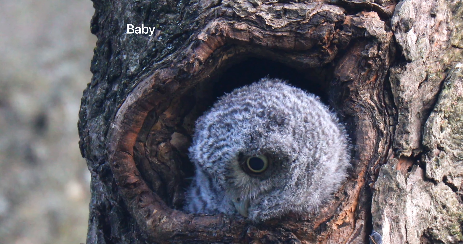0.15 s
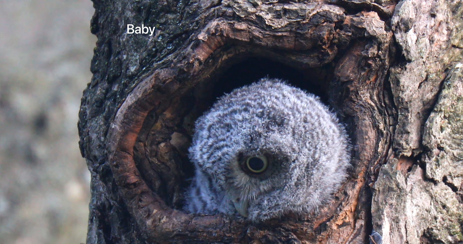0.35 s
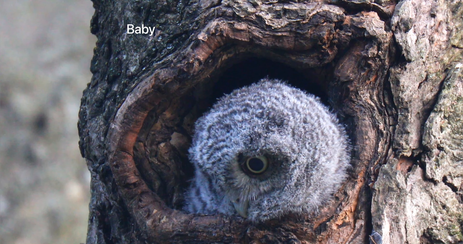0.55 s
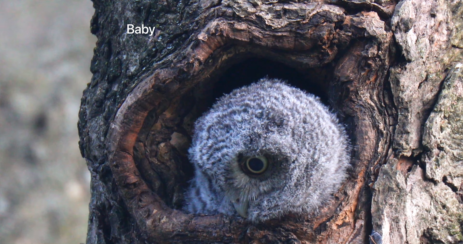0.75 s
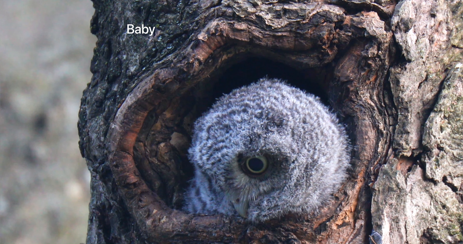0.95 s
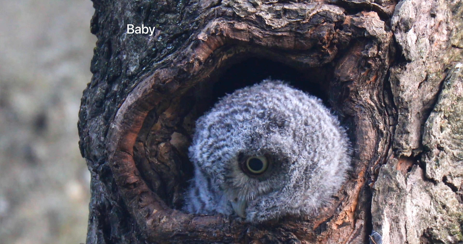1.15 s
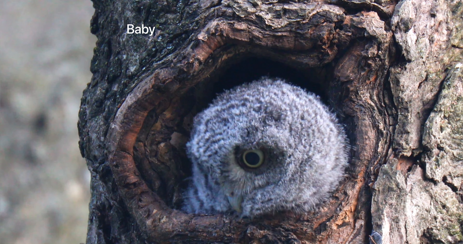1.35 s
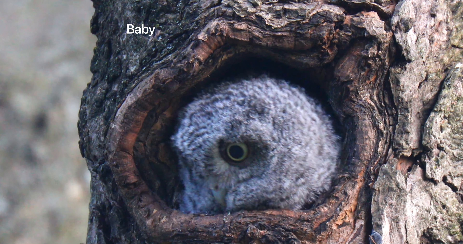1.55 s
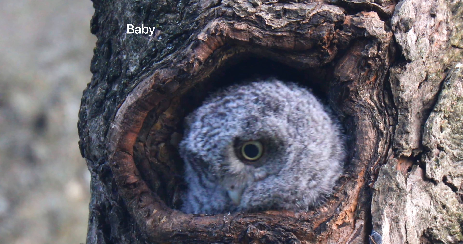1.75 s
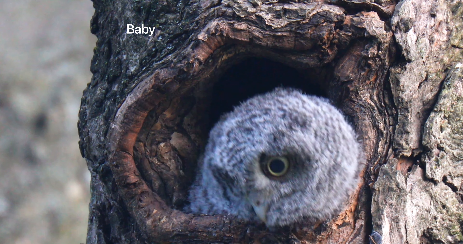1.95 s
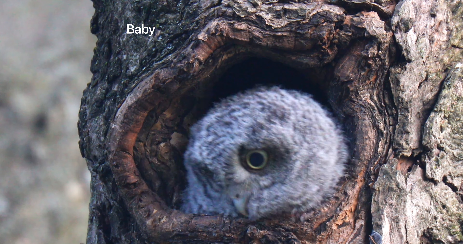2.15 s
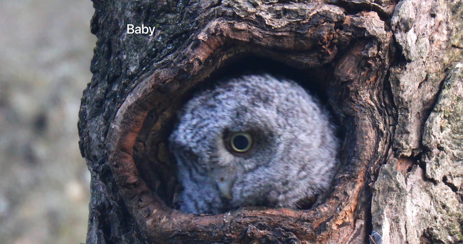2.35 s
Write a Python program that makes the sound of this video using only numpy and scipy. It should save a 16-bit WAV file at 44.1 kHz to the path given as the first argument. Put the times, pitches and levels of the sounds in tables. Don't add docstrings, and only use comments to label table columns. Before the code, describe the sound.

Close, mono outdoor sound of a small owl's quick, even trill: soft first notes, steady mellow hoots, a short slower stretch, then faster pulses to a weak last note, over quiet low hum, faint insects and feather brushing.

```python
import sys
import numpy as np
from scipy import signal
from scipy.fft import rfft, irfft
from scipy.io import wavfile
from scipy.ndimage import uniform_filter1d

SR = 44100
rng = np.random.default_rng(int(sys.argv[2]) if len(sys.argv) > 2 else 0)


def amplitude_ratio(level_db):
    exponent = np.asarray(level_db, float) / 20
    return 10 ** exponent


def wrap_up_sound(samples):
    columns = np.atleast_2d(samples).T
    tamed = np.clip(columns, -1, 1)
    steps = np.round(tamed * 32767).astype(np.int16)
    wavfile.write(sys.argv[1], SR, steps)


N = 105840

# frequency in Hz, density in dB per Hz.
NIGHT_SPECTRUM = [(15, -32), (25, 1.5), (173, -7.5), (281, -8.5), (313, -1.5), (399, -10), (482, -11.5),
                  (4380, -29.5), (15500, -46)]
# centre in Hz, width in Hz, level in dB, throb rate per s, throb depth in dB.
HUMS = [
    (51.3, 25, -53.5, 8, 0),
    (128, 42, -50.5, 8, -0.5),
    (345.3, 85, -56.5, 3.8, 1),
    (4110, 450, -70, 14, 3.5),
    (4405, 360, -69.5, 14, 1),
    (5030, 79, -75, 7, 2.5),
    (5296, 220, -70.5, 21, 1),
]
# start in s, length in s, effort in dB, top pitch in Hz.
HOOTS = [(0.149, 0.03, -38.5, 622), (0.2219, 0.0308, -30.6, 630.0), (0.2865, 0.041, -29.5, 651.0),
         (0.3595, 0.0425, -28.6, 663.0), (0.4322, 0.0419, -28.3, 668.0), (0.5031, 0.0435, -28.5, 673.0),
         (0.5763, 0.0432, -28.2, 679.0), (0.6514, 0.0417, -28.4, 682.0), (0.7241, 0.0397, -28.1, 687.0),
         (0.7971, 0.0393, -28.2, 688.0), (0.8696, 0.0375, -28.2, 690.0), (0.9391, 0.0369, -28.1, 692.0),
         (1.0088, 0.0352, -28.1, 694.0), (1.0761, 0.034, -28.4, 692.0), (1.1425, 0.0342, -28.5, 691.0),
         (1.2104, 0.0499, -28.4, 682.0), (1.3009, 0.0551, -28.3, 673.0), (1.3987, 0.0531, -28.2, 674.0),
         (1.4936, 0.0501, -28.0, 679.0), (1.5853, 0.0341, -27.6, 693.0), (1.6603, 0.0312, -27.3, 709.0),
         (1.7188, 0.0312, -27.8, 700.0), (1.7802, 0.0293, -27.8, 697.0), (1.8413, 0.0286, -27.8, 693.0),
         (1.903, 0.0286, -28.1, 690.0), (1.9643, 0.0285, -28.0, 686.0), (2.0271, 0.0277, -28.3, 683.0),
         (2.0903, 0.0276, -28.1, 677.0), (2.158, 0.025, -35, 624)]
# time in s, pitch rise in Hz, sag in Hz, attack in s,
# creep before the attack in dB.
MANNER = [(.15, -6, 20, .008, -14), (.22, -24, 0, .0022, -18), (.3, 17, 10, .003, -21),
          (.44, 23, 9, .0023, -16), (.52, 38, 9, .007, -13), (.75, 56, 6, .01, -5),
          (1.15, 70, 25, .0107, -3), (1.3, 24, 22, .0075, -22), (1.52, 29, 23, .008, -20),
          (1.66, 59, 46, .007, -13), (2.1, 31, 24, .007, -14), (2.16, 0, 20, .011, -10)]
# pitch in Hz, fundamental in dB, octave in dB, octave phase in rad,
# upper partials in dB.
THROAT = [(560, -3.8, .8, -2.8, -16), (590, 1.1, 2.6, -3.1, -12), (620, 6.2, 3.2, -2.7, -9),
          (645, 9.4, 2.0, -2.1, -5.5), (665, 12.0, -.6, -1.75, 0), (685, 14.1, -4.2, -1.3, 1)]
# frequency in Hz, level in dB.
UPPER_PARTIALS = [(1700, -7.5), (2000, -18.5), (2650, -24), (3300, -32.5), (4500, -44.5), (6000, -42.5),
                  (7300, -40), (13000, -74.5)]
# time in s, frequency in Hz, level in dB.
THROAT_RING = [(.22, 8900, -7.5), (.3, 8440, 3.5), (.4, 7830, -0.5), (.75, 7790, -0.5), (1.15, 7720, -6),
               (1.52, 7600, -4), (1.66, 7750, -5), (2.1, 7820, -5.5)]
# centre in s, length in s, level in dB, frequency in Hz, width in Hz.
RUSTLES = [
    (1.0, .26, -56, 1750, 500),
    (1.41, .05, -51, 2100, 1000),
    (1.46, .09, -55, 1600, 500),
    (1.43, .09, -53, 950, 350),
    (1.58, .09, -53, 1750, 800),
    (1.64, .14, -55, 1300, 900),
    (2.058, .055, -51, 1850, 700),
    (2.055, .05, -57, 2700, 400),
    (2.11, .12, -56, 1600, 500),
]

FULL_VOICE_DB = -29.5


def band(hz, width_hz):
    f = np.arange(N // 2 + 1) * SR / N
    spectrum = rfft(rng.standard_normal(N)) / (1 + (2 * (f - hz) / width_hz) ** 2)
    x = irfft(spectrum, N)
    return x / x.std()


def walk(rate_hz):
    hold = int(SR / rate_hz)
    steps = np.repeat(rng.standard_normal(N // hold + 4), hold)
    w = uniform_filter1d(uniform_filter1d(steps, hold), hold)[hold:N + hold]
    return w / w.std()


def logistic(x):
    return 1 / (1 + np.exp(-x))


def decay(t, tau_s):
    return np.exp(-np.maximum(t, -tau_s) / tau_s)


def night():
    air = np.zeros(N)
    spectrum_hz, spectrum_db = np.array(NIGHT_SPECTRUM).T
    for hz in 25 * 2 ** np.arange(0, 9.4, .5):
        density_db = np.interp(np.log(hz), np.log(spectrum_hz), spectrum_db)
        db = density_db + 10 * np.log10(hz) + 0.2 * walk(15)
        air += amplitude_ratio(db) * band(hz, 0.53 * hz)
    out = amplitude_ratio(-47) * air / air.std()
    for hz, width_hz, db, throb_hz, throb_db in HUMS:
        out += amplitude_ratio(db + throb_db * walk(throb_hz)) * band(hz, width_hz)
    return out


def pitch(u, length, db, top_hz, rise_hz, sag_hz):
    rise_s, sag_s, fall_s, fall_hz = .0128, .0038, .0051, 120
    lowest_hz, knee_hz = 566, 8
    sag_at_s = .023 * min(1, amplitude_ratio((db + 1 - FULL_VOICE_DB) / 2))
    climb = rise_hz * np.exp(-np.maximum(u, -.004) / rise_s)
    sag = sag_hz * logistic((u - sag_at_s) / sag_s)
    fall = fall_hz * min(1, amplitude_ratio(db - FULL_VOICE_DB)) * np.exp(np.minimum(u - length, .02) / fall_s)
    hz = top_hz - climb - sag - fall
    return lowest_hz + knee_hz * np.logaddexp(0, (hz - lowest_hz) / knee_hz)


def upper_partials(phase, hz, bright_db, ring_hz, ring_db):
    partial_hz, partial_db = np.array(UPPER_PARTIALS).T
    out = 0
    for k in range(3, 20):
        f = k * hz
        ring = 0
        for centre_hz, peak_db in ((ring_hz, -28), (8310, -36), (11700, -42.5)):
            ring = ring + amplitude_ratio(peak_db) / (1 + (2 * (f - centre_hz) / 233) ** 2)
        body = amplitude_ratio(bright_db + np.interp(np.log(f), np.log(partial_hz), partial_db))
        gain = body + amplitude_ratio(ring_db) * ring
        out = out + gain * np.cos(k * phase + 2 * np.pi * rng.random())
    return out


def hoot(start, length, db, top_hz, u, chance):
    manner, ring, throat = (np.array(table).T for table in (MANNER, THROAT_RING, THROAT))
    rise_hz, sag_hz, attack_s, creep_db = (np.interp(start, manner[0], c) for c in manner[1:])
    ring_hz, ring_db = (np.interp(start, ring[0], c) for c in ring[1:])
    hz = pitch(u, length, db, top_hz, rise_hz, sag_hz)
    low_db, octave_db, octave_rad, bright_db = (np.interp(hz, throat[0], c) for c in throat[1:])
    jitter, shimmer, breath, ring_breath = chance
    phase = 2 * np.pi * (np.cumsum(hz * (1 + .001 * jitter)) / SR + rng.random())

    opens = logistic(4 * u / attack_s)
    creep = amplitude_ratio(creep_db) * np.exp(np.minimum(u, 0) / .0041) * (1 - opens)
    tail = np.exp(-np.maximum(u - length, 0) / .0052)
    cut = logistic(-(u - length - .012 + attack_s / 2) / .0022)
    soft_attack_s, bend_s = .008, .002
    flick_rad = .8 * max(0, 1 - attack_s / soft_attack_s) * decay(u, bend_s)
    fundamental = amplitude_ratio(low_db) * (opens + creep) * tail * cut * np.cos(phase - flick_rad)

    since = u + .11 * attack_s
    snap_s = .0032 * max(1, amplitude_ratio(FULL_VOICE_DB - 2 - db))
    snap = logistic(4 * since / snap_s)
    shut = logistic(-2 * (u - length) / .0046)
    octave_rad = octave_rad + .9 * min(1, attack_s / soft_attack_s) * decay(since, bend_s)
    octave_db = octave_db + .2 * min(0, db - 6.5 - FULL_VOICE_DB)
    high = amplitude_ratio(octave_db) * np.cos(2 * phase + octave_rad)
    high = high + amplitude_ratio(-49) * breath + amplitude_ratio(-41.5 + ring_db) * ring_breath
    high = high + upper_partials(phase, hz, bright_db, ring_hz, ring_db)
    return amplitude_ratio(0.3 + db + .15 * shimmer) * (fundamental + high * snap * shut)


def echo(x):
    echo_db, t60_s = -29, .3
    t = np.arange(SR // 2) / SR
    tail = rng.standard_normal(len(t)) * amplitude_ratio(-60 * t / t60_s) * (t > .008)
    tail = tail / np.sqrt(np.sum(tail ** 2))
    return amplitude_ratio(echo_db) * signal.fftconvolve(x, tail)[:N]


def owl():
    out = np.zeros(N)
    chance = np.array([walk(250), walk(150), band(3800, 4000), band(7900, 900)])
    for start, length, db, top_hz in HOOTS:
        i = np.arange(int((start - .02) * SR), int((start + length + .036) * SR))
        out[i] += hoot(start, length, db, top_hz, i / SR - start, chance[:, i])
    return out + echo(out)


def rustles():
    t = np.arange(N) / SR
    out = np.zeros(N)
    for centre_s, length_s, db, hz, width_hz in RUSTLES:
        swell = np.exp(-(2 * (t - centre_s) / length_s) ** 2)
        out += amplitude_ratio(db + 1.5 * walk(150)) * swell * band(hz, width_hz)
    return out


def scene():
    return (night() + owl() + rustles())[None]


def band_limit(x):
    return signal.sosfilt(signal.butter(12, 15870, fs=SR, output="sos"), x)


def record(dry):
    top_cut = signal.ellip(8, .1, 40, 15800, fs=SR, output="sos")
    mix = signal.sosfiltfilt(top_cut, dry)
    return band_limit(mix)


dry = scene()
out = record(dry)
wrap_up_sound(out)
```